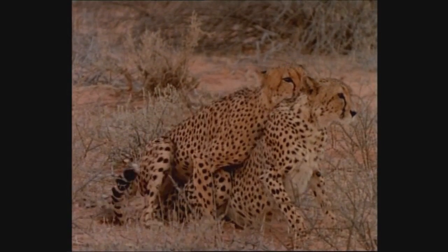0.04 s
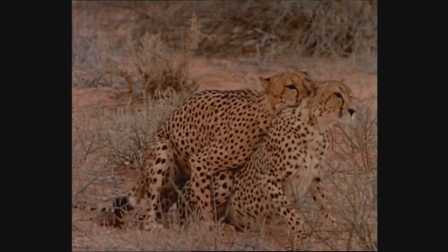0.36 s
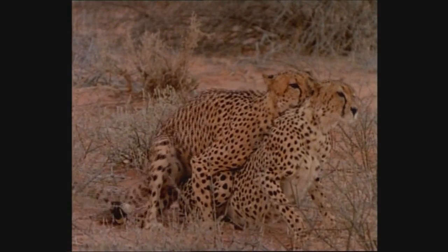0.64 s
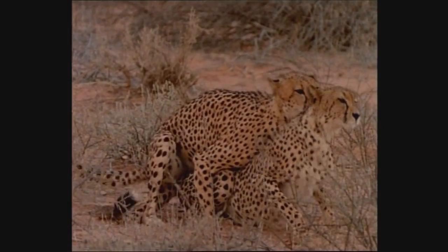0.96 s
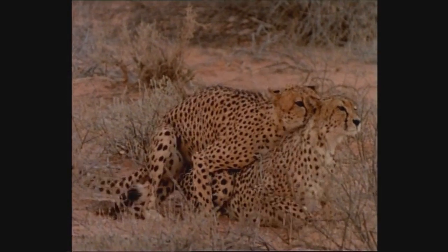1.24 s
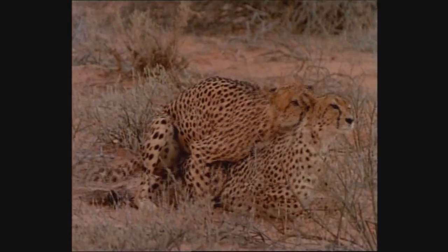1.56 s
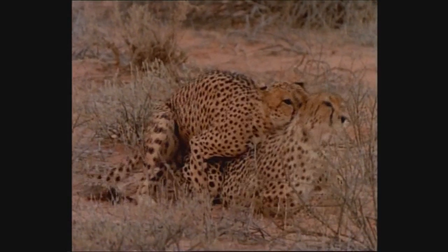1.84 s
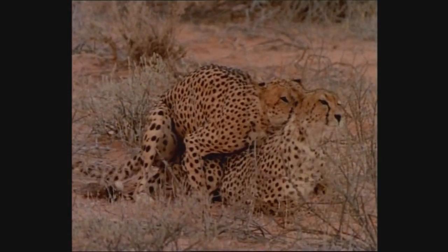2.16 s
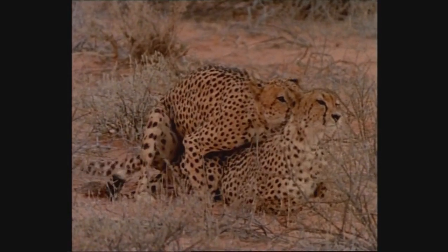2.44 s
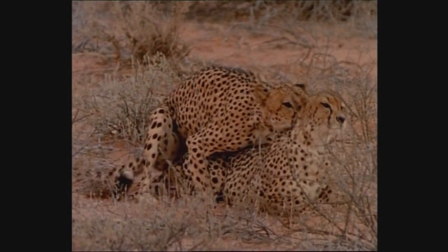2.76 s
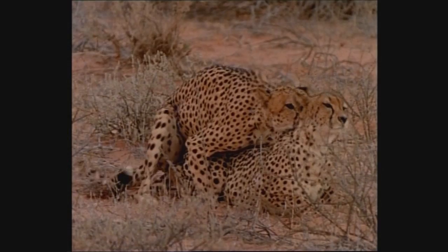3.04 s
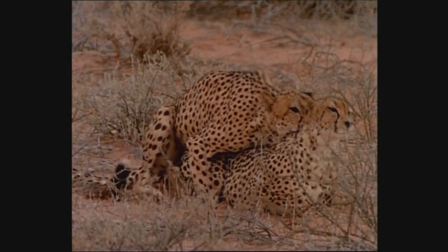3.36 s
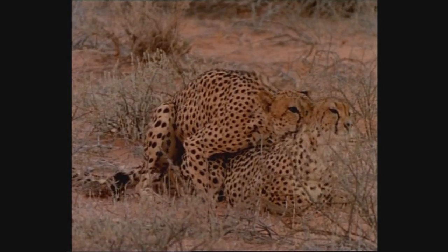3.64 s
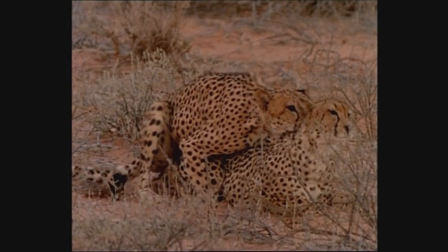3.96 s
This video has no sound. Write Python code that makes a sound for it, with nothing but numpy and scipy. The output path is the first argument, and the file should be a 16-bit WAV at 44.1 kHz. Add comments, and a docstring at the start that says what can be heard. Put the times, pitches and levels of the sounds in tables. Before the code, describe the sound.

Four raspy, rising cheetah squeals sound straight in front of the microphone outdoors. Afterwards there are only soft scuffs in sand and grass, a few snapping stalks and distant bird chirps over a low rumble of air.

```python
"""Cheetah in dry scrub

A cheetah in front of a stereo microphone gives four harsh, rising squeals: each starts as a rasp of
uneven pulses and tightens into a fluttering tone. Its paws scuff sand and dry grass and knock softly
on the ground, and stalks snap. Far off, small birds chirp, whistle and twitter over a low rumble of air."""
import sys
import numpy as np
from scipy import signal
from scipy.fft import rfft, irfft
from scipy.io import wavfile

SR = 44100
rng = np.random.default_rng(int(sys.argv[2]) if len(sys.argv) > 2 else 0)


def wav_record(signal):
    """Record a signal, one row per channel, as 16-bit PCM in the file named by sys.argv[1]."""
    frames = np.transpose(np.atleast_2d(signal))
    bounded = np.clip(frames, -1, 1)
    # unit amplitude maps onto the largest positive 16-bit level
    quanta = np.round(bounded * 32767).astype(np.int16)
    wavfile.write(sys.argv[1], SR, quanta)


N = 176400
T = np.arange(N) / SR
FREQS = np.fft.rfftfreq(N, 1 / SR)
SIDE = np.array([[1], [-1]])  # adds on the left, subtracts on the right

# The cat's calls. Each row: start, end and crest of the rise in seconds, starting and crest pitch in Hz,
# tone and rasp level in dB, opening level in dB relative to the crest.
SQUEALS = [(-.2, .082, -.03, 907, 1165, -31, -34.5, -3), (.363, .665, .568, 900, 1175, -32.5, -34.5, -1.5),
           (.954, 1.2, 1.112, 950, 1168, -32.5, -36, -4),
           (1.467, 1.766, 1.652, 975, 1172, -31, -34.8, -6.5)]
# The tone's partials, lowest first. Each row: gain in dB when loose and when tight, noisy share 0-1.
PARTIALS = [(-26, -11, .25), (-25, 0, .45)]
# The rasp from a loose and from a tight throat. Each row: frequency in Hz, gain in dB.
LOOSE_SPECTRUM = [(400, -30), (950, -17), (1500, -4.5), (2000, -3), (2750, 3), (3300, -0.5), (4000, -7.5),
                  (4750, -10), (5300, -43), (9000, -43)]
TIGHT_SPECTRUM = [(400, -16), (900, -29), (1250, -5.5), (1850, 5.5), (2600, 0.5), (3200, 2), (3800, -1),
                  (4300, 0.5), (4800, -7), (5300, -23), (9000, -32)]
# Open air. Each row: frequency in Hz, gain in dB.
AIR_SPECTRUM = [(12, -32), (20, 6), (59, 1), (148, -5), (232, -12), (478, -19), (686, -20.5), (1100, -21),
                (1820, -25.5), (2330, -23.5), (4190, -27), (8880, -37.5), (15500, -38.5)]
# How alike the air is left and right. Each row: frequency in Hz, correlation 0-1.
AIR_LIKENESS = [(30, 0.6), (70, 0.78), (150, 0.89), (350, 0.9), (1000, 1), (4000, 0.84), (15000, 1)]
# Paws and body on the ground. Each row: middle and half length in seconds, sand and grass level in dB.
SCUFFS = [(0.035, 0.044, -38.5, -65), (0.232, 0.064, -46, -47), (0.39, 0.014, -40.5, -58),
          (0.493, 0.067, -43.5, -64), (0.796, 0.032, -49, -51), (0.87, 0.023, -44.5, -51.5),
          (0.971, 0.045, -42, -51.5), (1.11, 0.052, -42.5, -51), (1.254, 0.047, -46.5, -61),
          (1.437, 0.063, -43, -58.5), (1.646, 0.044, -43.5, -53), (1.744, 0.039, -45.5, -44),
          (1.808, 0.023, -45, -72), (1.934, 0.029, -48.5, -50.5), (1.988, 0.0029, -41, -59),
          (2.05, 0.065, -44.5, -50), (2.3, 0.14, -42, -51.5), (2.526, 0.057, -48.5, -50.5),
          (2.64, 0.076, -43, -67), (2.83, 0.07, -48.5, -56), (2.943, 0.13, -48.5, -62),
          (3.055, 0.035, -39, -49), (3.143, 0.041, -48.5, -55.5), (3.261, 0.053, -49.5, -52),
          (3.361, 0.02, -46, -70), (3.452, 0.081, -51, -61), (3.701, 0.012, -48.5, -50.5),
          (3.811, 0.038, -45, -52), (3.958, 0.049, -54.5, -51.5)]
# Ground sand, brushed grass and a breaking stalk. Each row: frequency in Hz, gain in dB.
SAND_SPECTRUM = [(100, -30), (250, -6.5), (450, -1.5), (750, 3.5), (1100, -0.5), (1600, -5.5), (2500, -5.5),
                 (4000, -9.5), (8000, -21), (16000, -35)]
GRASS_SPECTRUM = [(300, -55), (1200, 5.5), (2700, 6.5), (4500, -6), (6500, -3.5), (9000, -10),
                  (12000, -13.5), (16000, -19)]
SNAP_SPECTRUM = [(500, -13), (2000, -2), (3500, 1.5), (7000, 3.5), (10000, -5), (16000, -14)]
# Distant chirps. Each row: start and length in seconds, first and last pitch in Hz, level in dB.
CHIRPS = [(.118, .04, 5000, 4250, -50), (.158, .028, 4200, 3550, -65), (.243, .022, 3150, 2450, -58),
          (.275, .026, 2600, 2050, -45), (.335, .035, 5100, 4150, -52), (1.283, .035, 5500, 3350, -55),
          (1.31, .05, 3400, 2250, -52.5), (1.432, .06, 3500, 3280, -49.5), (1.63, .055, 8000, 4300, -51.5),
          (2.142, .09, 5520, 5560, -55.5), (2.258, .024, 5200, 6350, -51), (2.275, .03, 6250, 5500, -52),
          (2.795, .04, 2500, 2150, -53), (3.32, .05, 2950, 2250, -57), (3.43, .025, 2700, 2200, -50),
          (3.48, .037, 2700, 2000, -55), (3.62, .04, 2520, 2950, -51.5), (3.643, .04, 8300, 4250, -47.5),
          (3.65, .052, 2700, 2080, -52), (3.717, .02, 5150, 4450, -48), (3.725, .03, 2700, 2080, -46),
          (3.888, .037, 3250, 2150, -62)]
# Dry stalks breaking. Each row: start in seconds, level in dB.
SNAPS = [(.379, -37), (.72, -45), (0.988, -39.5), (1.756, -37), (1.896, -45), (2.619, -39), (2.646, -36),
         (3.064, -40), (3.478, -33), (3.825, -41)]
# Held bird notes. Each row: start and length in seconds, pitch in Hz, sag as a share of it, level in dB.
WHISTLES = [(0.621, .36, 2160, 0.062, -44), (1.766, 0.12, 4130, 0, -56), (3.525, 0.1, 3320, 0.0077, -61),
            (3.58, 0.04, 4100, 0.032, -55.5), (3.684, 0.15, 4105, 0.0054, -55.5),
            (3.98, .21, 2210, .05, -46.5)]
# Paws striking the ground. Each row: start in seconds, pitch in Hz, level in dB.
KNOCKS = [(1.985, 970, -40), (2.096, 910, -42), (3.488, 1150, -44)]
# The farthest birds. Each row: start and length in seconds, first and last pitch in Hz, level in dB.
TWITTERS = [(2.28, .14, 5020, 3900, -54.5), (2.4, 0.13, 4150, 3700, -55), (2.67, .11, 3780, 3000, -52),
            (3.505, 0.043, 4700, 3400, -54.5)]


def amp(db):
    """Decibels to gain."""
    return 10 ** (np.asarray(db) / 20)


def unit(x):
    """Scales to rms 1."""
    return x / np.sqrt(np.mean(x ** 2) + 1e-20)


def curve(points):
    """Spreads a table over the spectrum on a log-frequency axis."""
    hz, value = np.transpose(points)
    return np.interp(np.log(FREQS + 1), np.log(hz + 1), value)


def colour(x, spectrum):
    """Filters x by a spectrum table, at rms 1."""
    return unit(irfft(rfft(x) * amp(curve(spectrum)), N))


def wander(rate_hz):
    """Smooth random motion up to about a rate, at rms 1."""
    return unit(irfft(rfft(rng.standard_normal(N)) * np.exp(-(FREQS / rate_hz) ** 2), N))


def step(x):
    """A soft step from 0 to 1."""
    return .5 + .5 * np.tanh(x / 2)


def phase_of(hz):
    """The running phase of a moving pitch, in radians."""
    return 2 * np.pi * np.cumsum(hz, axis=-1) / SR


def smear(phase, width_hz):
    """A narrow band of noise that follows a pitch."""
    return wander(width_hz) * np.sin(phase) + wander(width_hz) * np.cos(phase)


def partial(phase, fuzz, width_hz):
    """A sine of which a share (fuzz, 0-1) is smeared into noise."""
    return np.sqrt(2 * (1 - fuzz ** 2)) * np.cos(phase) + fuzz * smear(phase, width_hz)


def pulses(rate_hz, spread_db, jitter, slip=0, width_s=.00003):
    """One sharp pulse a cycle, uneven in height and timing; slip shifts some by a quarter cycle."""
    turns = np.cumsum(rate_hz) / SR
    cycle = np.round(turns).astype(int)
    height, late, jump = np.clip(rng.standard_normal((N, 3)), -1.6, 1.6)[cycle].T
    offset = turns - cycle - jitter * late - np.clip(np.round(slip * jump), -1, 1) / 4
    return unit(amp(spread_db * height) * np.exp(-(offset / rate_hz / width_s) ** 2))


def throat_rasp(hz, tight, hiss):
    """Pulses and hiss; as the throat tightens (0-1), pulses at half the rate take over."""
    loose = amp(.5) * colour(hiss + pulses(hz, spread_db=5.2, jitter=.04), LOOSE_SPECTRUM)
    taut = colour(hiss + pulses(hz / 2, spread_db=1, jitter=.02, slip=.8), TIGHT_SPECTRUM)
    return np.sqrt(1 - tight) * loose + np.sqrt(tight) * taut


def squeals(rise_hz_per_s=1950, creep_hz_per_s=380, flutter_hz=145, attack_s=.006, release_s=.00485):
    """The cat, centre: a rasp climbs and tightens into a fluttering tone, strongest on partial two."""
    flutter = np.cos(phase_of(flutter_hz * (1 + .3 * wander(112.2))))
    bend = 1 + .012 * wander(29) + .013 * wander(214) - .024 * flutter
    throb = 1 + .33 * flutter
    hiss = .42 * rng.standard_normal(N) + .11 * SIDE * rng.standard_normal(N)
    out = np.zeros((2, N))
    for start, end, crest, low_hz, crest_hz, tone_db, rasp_db, start_db in SQUEALS:
        tight = step((T - crest + .028) / .022)  # the throat tightens just ahead of the crest
        closing = step((T - end) / .006)
        gate = np.clip((T - start) / attack_s, 0, 1) * step((end - T) / release_s)
        swell = amp(np.interp(T, [start, crest], [start_db, 0]))
        past_crest = np.minimum(T, end) - crest
        climb_hz = np.minimum(rise_hz_per_s * past_crest, creep_hz_per_s * past_crest)
        hz = bend * np.maximum(low_hz, crest_hz + climb_hz)
        lowest = phase_of(hz * (1 + .13 * closing))  # the lowest partial flicks up at the end
        tone = np.zeros(N)
        for phase, (loose_db, tight_db, fuzz) in zip([lowest, 2 * phase_of(hz)], PARTIALS):
            tone += amp(loose_db + (tight_db - loose_db) * tight) * partial(phase, fuzz, width_hz=125)
        voice = amp(tone_db - 3 * closing) * throb * tone + amp(rasp_db) * throat_rasp(hz, tight, hiss)
        flick_level = amp(tone_db - 20) * np.exp(-((T - end - .005) / .014) ** 2)
        out -= gate * swell * voice + flick_level * np.sqrt(2) * np.cos(lowest)
    return out


def air(level_db=-44.5, rumble_hz=200, whine_hz=15335, whine_db=-86):
    """Low rumble and faint hiss of open country, a touch to the left, with a thin steady whine."""
    left, other = rfft(rng.standard_normal((2, N)))
    likeness = np.clip(curve(AIR_LIKENESS), 0, 1)
    right = likeness * left + np.sqrt(1 - likeness ** 2) * other
    bed = colour(irfft(np.array([left, right]), N), AIR_SPECTRUM)
    rumble = signal.sosfilt(signal.butter(1, rumble_hz, fs=SR, output="sos"), bed)
    swell_db = 4 * step((.9 - T) / .18) + 3.5 * wander(2)  # eases about a second in, and keeps drifting
    bed += rumble * (amp(swell_db) - 1)
    whine = amp(whine_db) * np.sqrt(2) * np.sin(2 * np.pi * whine_hz * T)
    return amp(level_db + .7 * SIDE) * bed + whine


def grains(spectrum, clump_db, per_s=5000):
    """Dense clicks of uneven size that come in clumps."""
    size = amp(-.5 * np.minimum(rng.exponential(1, N), 5)) * rng.standard_normal(N)
    clicks = size * (rng.random(N) < per_s / SR)
    return unit(colour(clicks, spectrum) * amp(clump_db * wander(54)))


def scuffs(grass_width=.13):
    """Each shift of weight grinds sand and brushes dry grass."""
    sand_power, grass_power = np.zeros((2, N))
    for middle, half, sand_db, grass_db in SCUFFS:
        stroke = np.exp(-((T - middle) / half) ** 2)
        sand_power += stroke * amp(sand_db) ** 2
        grass_power += stroke * amp(grass_db) ** 2
    grass = grains(GRASS_SPECTRUM, clump_db=3.5)
    grass = grass + grass_width * SIDE * grains(GRASS_SPECTRUM, clump_db=3.5)
    sand = grains(SAND_SPECTRUM, clump_db=1.5)
    return np.sqrt(sand_power) * sand + np.sqrt(grass_power) * grass


def chirps(bend=.7):
    """Quick sweeps of small birds, blurred by distance."""
    hz, level = np.zeros((2, 2, N))
    for k, (start, length, from_hz, to_hz, db) in enumerate(CHIRPS):
        voice = k % 2  # two voices take turns, so notes may overlap
        on = (T >= start) & (T < start + length)
        progress = (T[on] - start) / length
        glide = (1 - np.exp(-bend * progress)) / (1 - np.exp(-bend))
        hz[voice, on] = from_hz * (to_hz / from_hz) ** glide
        level[voice, on] = amp(db) * np.sqrt(abs(np.sin(np.pi * progress)))
    phases = phase_of(hz * (1 + .012 * wander(128)))
    return (level * partial(phases, fuzz=.65, width_hz=220)).sum(0)


def scrub_echoes(x, t60_s=.22, per_s=2000):
    """Bushes and ground scatter thin echoes, different on each side of the microphone."""
    t = T[:SR // 2]
    taps = rng.standard_normal((2, len(t))) * (rng.random((2, len(t))) < per_s / SR)
    taps *= amp(-60 * t / t60_s) * (t > .004)
    taps = taps + .5 * taps[::-1]  # each side hears some of the other
    return signal.fftconvolve(x[None], taps / np.linalg.norm(taps[0]), axes=1)[:, :N]


def snaps(decay_s=.0012):
    """Dry stalks break with short, bright cracks."""
    level = sum(amp(db) * (T >= start) * np.exp(-abs(T - start) / decay_s) for start, db in SNAPS)
    return level * colour(rng.standard_normal(N), SNAP_SPECTRUM)


def whistles(fade_db=-2):
    """Distant birds hold steady notes; the low ones sag most towards their end."""
    out, waver = np.zeros(N), .002 * wander(39)
    for start, length, top_hz, sag, db in WHISTLES:
        progress = np.clip((T - start) / length, 0, 1)
        hz = top_hz * (1 - sag * progress ** 2 + waver)
        gate = np.minimum(30 * progress * (1 - progress), 1)
        out += amp(db + fade_db * progress ** 2) * gate * partial(phase_of(hz), fuzz=.25, width_hz=55)
    return out


def knocks(rise_s=.0024):
    """A paw meets the ground: a few cycles of a dull, quickly damped ring."""
    out = np.zeros(N)
    for start, hz, db in KNOCKS:
        age = np.maximum(T - start, 0)
        out += amp(db) * age / rise_s * np.exp(1 - age / rise_s) * np.sin(2 * np.pi * hz * age)
    return out


def twitters():
    """The farthest birds: each falling run reaches the microphone as one blurred band."""
    out = np.zeros(N)
    for start, length, from_hz, to_hz, db in TWITTERS:
        progress = np.clip((T - start) / length, 0, 1)
        hz = from_hz * (to_hz / from_hz) ** progress
        out += amp(db) * np.sin(np.pi * progress) * smear(phase_of(hz), width_hz=330)
    return out


def scene():
    """The cat and its footing in the middle, birds far behind, open air all round."""
    cat, song = squeals(), chirps() + twitters()
    echoes = scrub_echoes(amp(-23) * cat.mean(0) + amp(-6) * song)
    footing = scuffs() + snaps() + knocks()
    return cat + song + whistles() + echoes + footing + air()


def record(dry):
    """The recorder cuts the treble steeply at the top of its band."""
    lowpass = signal.firwin(511, cutoff=15750, window=("kaiser", 9), fs=SR)
    return signal.oaconvolve(dry, lowpass[None], "same")


dry = scene()
out = record(dry)
wav_record(out)
```